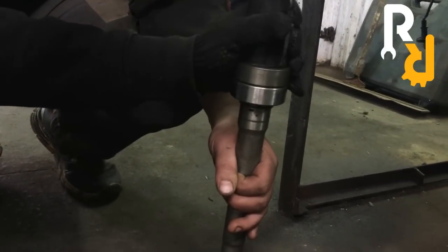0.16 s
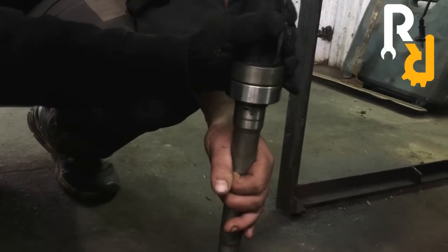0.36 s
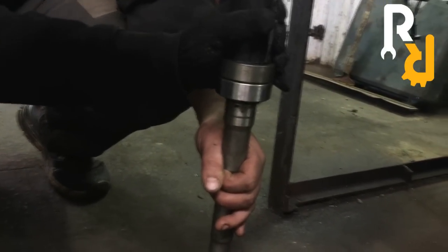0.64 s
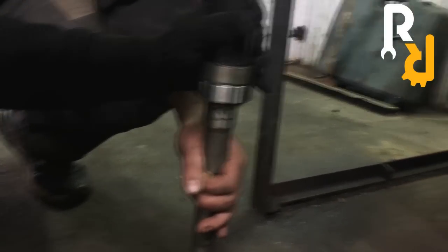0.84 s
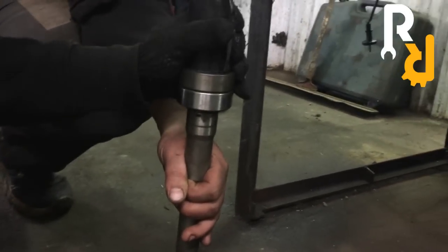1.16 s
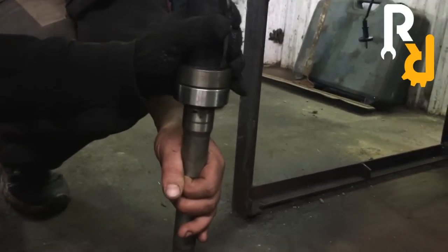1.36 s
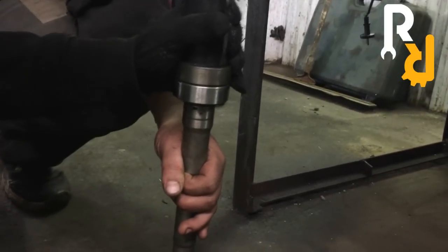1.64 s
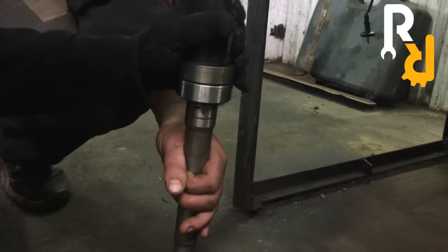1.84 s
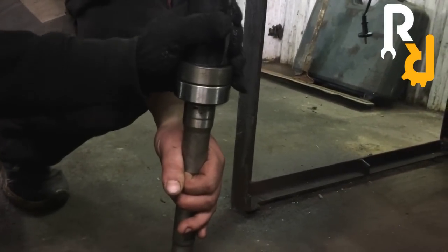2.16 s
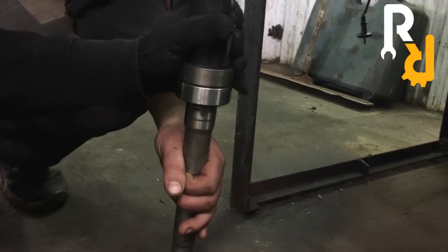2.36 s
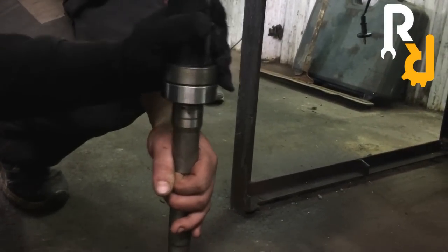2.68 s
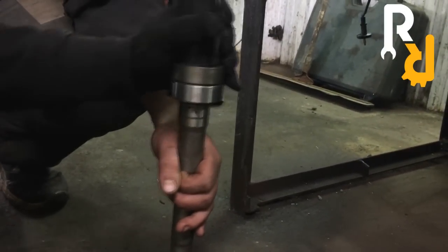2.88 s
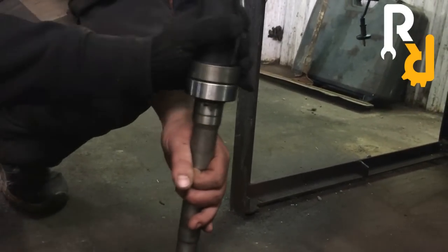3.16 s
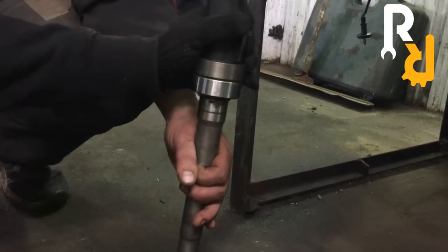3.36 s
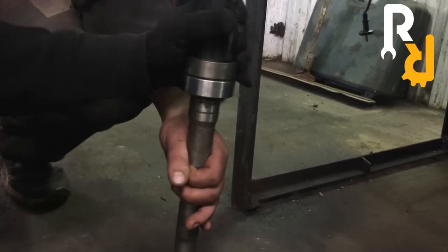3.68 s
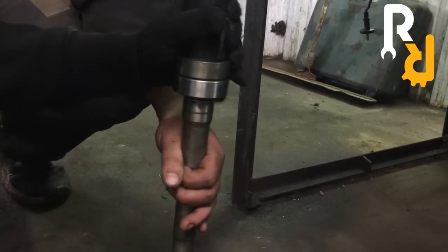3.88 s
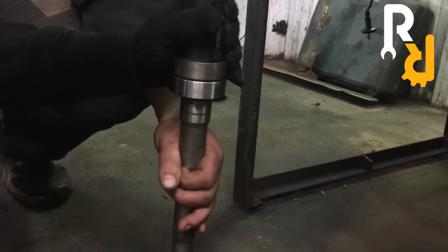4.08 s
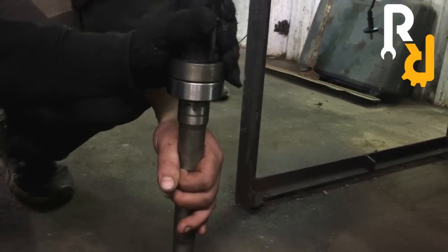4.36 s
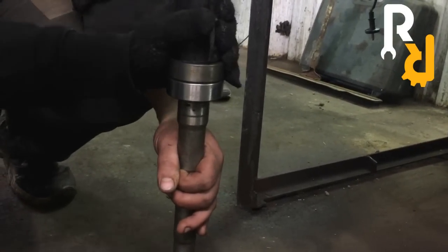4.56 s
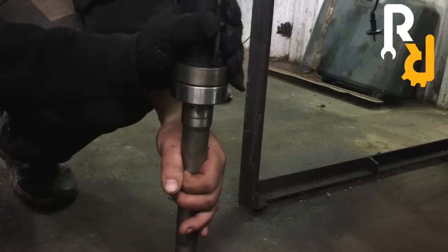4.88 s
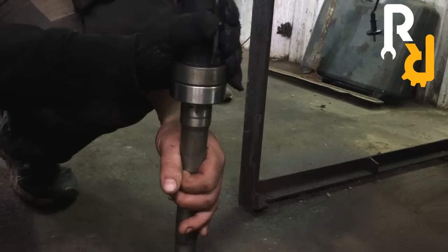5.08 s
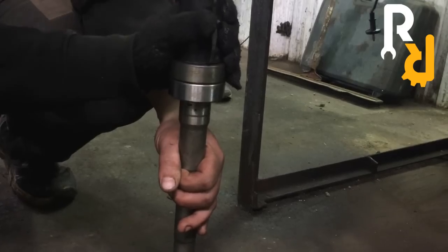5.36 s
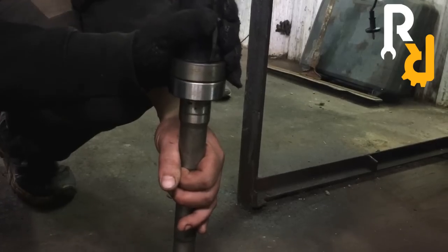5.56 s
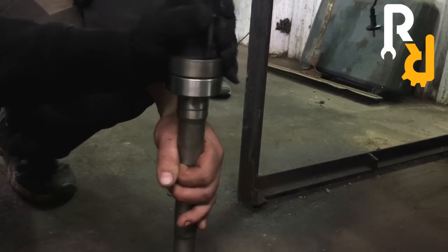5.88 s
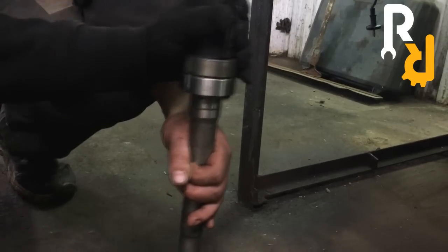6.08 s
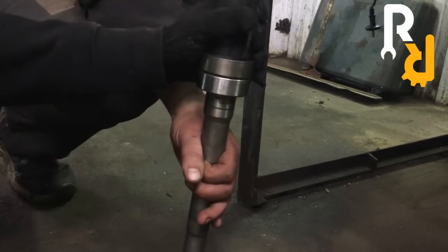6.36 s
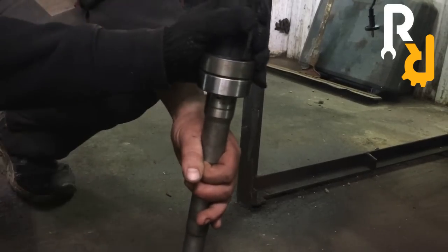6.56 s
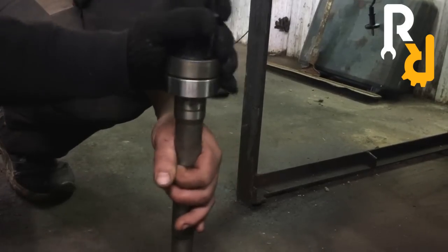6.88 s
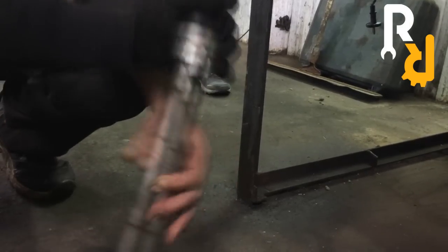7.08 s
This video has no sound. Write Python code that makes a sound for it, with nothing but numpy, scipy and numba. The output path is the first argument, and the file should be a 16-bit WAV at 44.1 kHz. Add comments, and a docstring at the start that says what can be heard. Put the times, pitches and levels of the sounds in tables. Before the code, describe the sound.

Close to the microphone, a hammer strikes a steel bearing on a hand-held shaft standing on concrete. Light setting taps alternate with heavy, bright cracks that thud deep into the floor, roughly one blow every half second with a pause midway. The hall rings after each hit. Finally the hammer drops and clatters, and the grip rustles faintly.

```python
"""A hammer drives a bearing onto a hand-held steel shaft that stands on a concrete floor, in a reverberant workshop.
Light setting taps alternate with heavy blows that thud into the floor; then the hammer is dropped and clatters.
Blows are chattering clicks, ringing steel modes and a sagging floor tone; knocks are shaped clicks with a thin ping.
Grip rustles and low rumble are shaped noise, and decaying noise makes the hall's echo.
The close microphone overloads on loud peaks; its gain control ducks them and lets the echo swell back."""
import sys
import numpy as np
from scipy import signal
from scipy.fft import rfft, irfft, next_fast_len
from scipy.io import wavfile
from scipy.ndimage import uniform_filter1d, minimum_filter1d, map_coordinates
from numba import njit

SR = 44100
rng = np.random.default_rng(int(sys.argv[2]) if len(sys.argv) > 2 else 0)


def to_wav(s):
    """Save 16-bit WAV."""
    ch = np.atleast_2d(s).T  # columns
    pcm = np.round(np.clip(ch, -1, 1) * 32767)  # PCM
    wavfile.write(sys.argv[1], SR, pcm.astype(np.int16))


N = 318666


def amp(db):
    """Decibels to gain."""
    return 10 ** (np.asarray(db) / 20)


def unit(x):
    """Scale to rms 1."""
    return x / np.sqrt(np.mean(x ** 2) + 1e-20)


def along(points, hz):
    """Read (f/Hz, value) points on a log frequency axis."""
    f, value = np.transpose(points)
    return np.interp(np.log(hz + 1), np.log(f + 1), value)


def fade(t, t60):
    """Exponential decay, 60 dB down at t60 seconds."""
    return np.exp(-np.log(1000) * t / np.maximum(t60, 1e-4))


def filtered(x, response):
    """Multiply the spectrum of x by a response, given as a function of frequency."""
    size = next_fast_len(len(x) + SR // 4)
    spectrum = rfft(x, size) * response(np.fft.rfftfreq(size, 1 / SR))
    return irfft(spectrum, size)[:len(x)]


def noise(size, shape_db):
    """Noise of rms 1 whose spectrum in dB is a function of frequency."""
    return unit(filtered(rng.standard_normal(size), lambda hz: amp(shape_db(hz))))


def add(track, s, sound):
    """Mix a sound into the track at time s, in seconds."""
    start = max(round(s * SR), 0)
    track[start:start + len(sound)] += sound[:N - start]


def click(shape_db, size=4096):
    """One sharp impulse of energy 1 whose spectrum in dB is a function of frequency."""
    cepstrum = irfft(np.log(amp(shape_db(np.fft.rfftfreq(size, 1 / SR)))))
    cepstrum[1:size // 2] *= 2  # folding makes it causal: all the energy comes right at the start
    cepstrum[size // 2 + 1:] = 0
    pulse = irfft(np.exp(rfft(cepstrum)))
    return pulse / np.linalg.norm(pulse)


def chattering(pulse, t, t60):
    """The pulse repeated densely at random, dying away."""
    bounces = rng.standard_normal(len(t)) * fade(t, t60)
    return signal.fftconvolve(bounces, pulse)[:len(t)]


def ring(modes, t):
    """Damped sine modes, each with a fresh level and phase at every strike."""
    total = np.zeros(len(t))
    for hz, db, t60 in modes:
        strike = amp(db + rng.standard_normal())
        total += strike * fade(t, t60) * np.sin(2 * np.pi * (hz * t + rng.random()))
    return total


# the workshop's low rumble: (f/Hz, relative level/dB)
RUMBLE_SPECTRUM = [(15, -33.5), (30, -19.5), (55, 0), (110, -4), (200, -10.5), (330, -13.5), (600, -15),
                   (900, -12), (1500, -19), (2100, -23.5), (3200, -43), (5000, -49), (8000, -51),
                   (15000, -55.5)]
RUMBLE_START_DB, RUMBLE_FALL_DB_PER_S = -41, 1


def ambience():
    """The workshop's low rumble: shaped noise that slowly gets quieter."""
    level_db = RUMBLE_START_DB - RUMBLE_FALL_DB_PER_S * np.arange(N) / SR
    return amp(level_db) * noise(N, lambda hz: along(RUMBLE_SPECTRUM, hz))


# how long the hall rings: (f/Hz, t60/s)
HALL_T60 = [(100, .7), (300, 0.87), (1000, 1.45), (2000, 1.428), (4000, 1.177), (6000, 0.9), (8500, 0.61),
            (12000, .48), (16000, .38)]
# tone of the hall's echo: (f/Hz, level/dB)
HALL_COLOUR = [(60, -34.5), (170, -6.5), (300, 8.5), (500, 4), (1200, 2.5), (3500, -.5), (6000, -6),
               (10000, -3.5), (16000, -8.5)]


def hall(sound, near_db, hall_db, near_t60, build_s=0.0009):
    """Quick scatter off nearby things and the hall's long tail, as noise decaying at its own rate in each band."""
    hz, s, bands = signal.stft(rng.standard_normal(2 * SR), SR, nperseg=256)
    near = amp(near_db) * fade(s, near_t60)
    far = amp(hall_db) * fade(s, along(HALL_T60, hz)[:, None])
    colour = amp(along(HALL_COLOUR, hz))[:, None]
    tail = signal.istft(bands * (near + far) * colour, SR, nperseg=256)[1]
    tail *= 1 - np.exp(-np.arange(len(tail)) / SR / build_s)  # echoes take a moment to arrive
    return signal.fftconvolve(sound, tail)


# spectrum of steel on steel: (f/Hz, level/dB)
CRACK_SPECTRUM = [(30, -37), (150, -12), (400, -0.5), (650, 1), (850, -3), (2000, 1), (2600, -1.5),
                  (3800, 1.5), (5300, -1), (6700, -5.5), (7600, -11), (8700, -10), (10200, -18.5),
                  (11500, -16), (15500, -20.5)]
LINGER_DB, LINGER_AGE_S = 8, 0.5


def lingering_echo():
    """The hall's dying answer to an earlier blow: an echo joined half a second into its decay."""
    crack = click(lambda hz: along(CRACK_SPECTRUM, hz))
    echo = hall(crack, near_db=-46, hall_db=-50, near_t60=0.16)
    track = np.zeros(N)
    add(track, 0, amp(LINGER_DB) * echo[round(LINGER_AGE_S * SR):])
    return track


# the grip shifts on the steel: (t/s, level/dB, length/s either side of the peak)
RUSTLES = [(3.685, -71.5, 0.021), (4.475, -63.5, 0.041), (7.05, -54.5, .022), (7.105, -60.5, 0.021),
           (7.166, -59, .017)]


def grip():
    """Faint gritty rustles of glove and hand: uneven grains of noise under short swells."""
    t = np.arange(N) / SR
    strokes = sum(amp(db) * np.exp(-((t - s) / length) ** 2) for s, db, length in RUSTLES)
    grains = unit(uniform_filter1d(rng.exponential(size=N) ** 3, 40))
    spectrum = [(500, -5), (4200, 3.5), (8000, -4.5), (15000, -11)]  # (f/Hz, level/dB)
    return strokes * grains * noise(N, lambda hz: along(spectrum, hz))


# loose knocks, rebounds and the hammer falling on the floor: (t/s, level/dB, centre f/Hz)
KNOCKS = [ (1.6940, 19, 3780), (4.8568, 3, 3820), (6.6900, 9.5, 1610), (6.6939, 5.5, 380),
          (6.7160, -12, 1500), (6.7411, 14.5, 2330), (6.7440, 6.5, 920), (6.767, 1.5, 1730),
          (6.7881, 1.5, 1570), (6.8706, 5.5, 4300), (6.921, -8, 2600), ]
# spectrum shared by the knocks: (f/Hz, level/dB)
KNOCK_SPECTRUM = [(30, -11.5), (160, 8), (350, 11), (1000, 1.5), (2800, -3.5), (5000, -17.5), (8000, -27.5),
                  (15000, -36.5)]
# thin ping of hardened steel, heard in knocks and blows: (f/Hz, level/dB, t60/s)
PING = [(11200, -32, .15), (14580, -39, .12), (15020, -49.5, .15)]


def knocks():
    """Single contacts, each focused around its own pitch, with a little chatter, a thin ping and an echo."""
    track, t = np.zeros(N), np.arange(SR // 2) / SR
    for s, db, centre_hz in KNOCKS:
        focus_db = lambda hz: -7 * np.log1p(np.log2((hz + 1) / centre_hz) ** 2)
        contact = click(lambda hz: along(KNOCK_SPECTRUM, hz) + focus_db(hz))
        chatter = amp(-22) * chattering(contact, t, t60=0.025)
        ping = amp(-28.5) * ring(PING, t)
        echo = hall(contact, near_db=-46.5, hall_db=-47.0, near_t60=0.36)
        for part in contact, chatter + ping, echo:
            add(track, s, amp(db) * part)
    return track


# treble gained per octave above the corner, for each dB of force over a medium blow (lost below it)
BRIGHTER_DB, BRIGHT_ABOVE_HZ, MEDIUM_FORCE_DB = 0.2535, 3800, 4
CLANG_OCTAVES = 0.42  # from the clang's centre to half its boost in dB
RESONANCE_DB, RESONANCE_SPACING_HZ = 2.16, 130  # random ripple: a crowd of short resonances


def steel_contact(force_db, clang_hz, clang_db):
    """The crack of the hammer face: brighter the harder it lands, with a broad clang and many small resonances."""
    heights = rng.standard_normal(size=512)  # drawn anew for each blow

    def shape_db(hz):
        octaves_up = np.log2(np.maximum(hz / BRIGHT_ABOVE_HZ, 1))
        treble = BRIGHTER_DB * (force_db - MEDIUM_FORCE_DB) * octaves_up
        clang = clang_db / (1 + (np.log2((hz + 1) / clang_hz) / CLANG_OCTAVES) ** 2)
        ripple = map_coordinates(heights, [hz / RESONANCE_SPACING_HZ], mode="mirror")
        crowd = RESONANCE_DB * hz / (hz + 1500) * ripple  # little ripple in the bass
        return along(CRACK_SPECTRUM, hz) + treble + clang + crowd

    return click(shape_db)


# the floor's note: where it settles, how far above that it starts, and how fast it sags
THUD_HZ, THUD_SAG_HZ, THUD_SAG_S = 54.6, 210, 0.0049
THUD_ATTACK_S, THUD_LONGEST_T60_S = 0.0026, 0.095


def thud(t, weight_db):
    """The shaft punches the floor with a falling pitch; a harder push swings for longer, up to a limit."""
    cycles = THUD_HZ * t + THUD_SAG_HZ * THUD_SAG_S * (1 - np.exp(-t / THUD_SAG_S))
    t60 = THUD_LONGEST_T60_S * amp(min(weight_db, 0) / 2)
    attack = 1 - np.exp(-t / THUD_ATTACK_S)
    return np.sin(2 * np.pi * cycles) * fade(t, t60) * attack


# hammer blows, the heavy ones thudding harder as the bearing seats;
# where the face lands sets the pitch of the clang and how freely each part rings:
# (t/s, force level/dB, chatter t60/s, floor thud level/dB, clang centre f/Hz, clang level/dB,
#  shaft ring level/dB, race ring level/dB, ping level/dB)
BLOWS = [ (0.0005, -0.5, 0.0043, -60.5, 8700, 3, -1.5, -10, -13.5),
         (0.5632, 13, 0.022, -16, 2750, 3, -11, -5, -14), (1.092, 4.5, 0.025, -59, 990, 3.5, 1, 1.5, -9.5),
         (1.642, 16, 0.062, -0.5, 3780, 4.5, 2.5, -7.5, 2.5),
         (2.1780, 1.5, 0.045, -48, 3200, 6, -3.5, -14.5, -31),
         (2.7523, 15, 0.048, 1, 500, 1.5, -9.5, -15, -3.5), (4.1620, -2, 0.023, -41, 2120, 6.5, -8, 1.5, 2),
         (4.803, 17, .033, 5, 5240, 8, -14, -6.5, -5.5), (5.3630, 0, 0.04, -62, 3110, 3.5, -21, -11.5, 3),
         (5.9090, 14, 0.03, 6, 1300, 5, -14, -13.5, 0), ]
# steel modes of shaft, bearing race and hammer head: (f/Hz, level/dB, t60/s)
SHAFT = [(626, -23.5, .06), (2012, -12.5, .035), (3280, -19.5, .035), (3725, -12, .08), (6680, -26, 0.054)]
RACE = [(2060, -17, 0.0076), (2130, -15, 0.014), (5400, -10.5, 0.027), (5330, -12, 0.089), (5340, -39, .31),
        (13700, -25, .055)]
HEAD = [(4670, -14, 0.041), (8530, -20, 0.043), (8480, -18.5, .06), (12130, -26.5, .049)]
# spectrum of the floor's shudder: (f/Hz, level/dB)
SHUDDER_SPECTRUM = [(20, 3.5), (45, -1), (100, -4), (170, -1), (330, -14), (1500, -49)]
RING_LOSS = 0.13  # dB of race and head ring lost per dB of force: a hard blow presses the parts together
HALL_GROWS, SCATTER_GROWS = 0.22, 0.84  # extra dB of echo per dB of force: hard blows shake things nearby


def hammer():
    """Each blow makes the parts chatter, rings shaft, bearing and hammer head, and pushes on the floor."""
    track, t = np.zeros(N), np.arange(SR * 3 // 4) / SR
    for s, force_db, chatter_t60, thud_db, clang_hz, clang_db, shaft_db, race_db, ping_db in BLOWS:
        crack = steel_contact(force_db, clang_hz, clang_db)
        chatter = chattering(crack, t, chatter_t60)

        pressed = amp(-RING_LOSS * force_db) * (amp(race_db) * ring(RACE, t) + ring(HEAD, t))
        steel = amp(shaft_db) * ring(SHAFT, t) + pressed + amp(ping_db) * ring(PING, t)

        shudder = noise(len(t), lambda hz: along(SHUDDER_SPECTRUM, hz)) * fade(t, t60=0.08)
        shudder_db = thud_db / 2 - 11  # grows more slowly than the thud
        floor = amp(thud_db) * thud(t, thud_db) + amp(shudder_db) * shudder

        # one strong pulse stands for the chatter in the echo
        radiated = steel + amp(22.0) * np.pad(crack, (0, len(t) - len(crack)))
        near_db = -45.0 + SCATTER_GROWS * force_db
        echo = hall(radiated, near_db, hall_db=-50.0, near_t60=0.16)
        add(track, s, amp(force_db) * (chatter + steel + floor))
        add(track, s, amp(force_db + HALL_GROWS * force_db) * echo)
    return track


def scene():
    """Everything that reaches the microphone."""
    return (hammer() + knocks() + grip() + ambience() + lingering_echo())[None]


@njit
def follow(wanted, attack, release):
    """A gain that drops quickly to the wanted value and creeps back; times in samples."""
    out, gain = np.empty_like(wanted), 1.0
    for i in range(len(wanted)):
        gain += (wanted[i] - gain) / (attack if wanted[i] < gain else release)
        out[i] = gain
    return out


def gain_control(x, threshold_db, depth_db, hold, attack, release):
    """Loud sound pulls the gain down, by depth_db at most, where it stays for a moment; times in seconds."""
    level = np.sqrt(np.abs(uniform_filter1d(x ** 2, size=128)))
    wanted = np.maximum(1 / np.maximum(level / amp(threshold_db), 1), amp(depth_db))
    half = int(hold * SR / 2)
    held = minimum_filter1d(wanted, 2 * half + 1, origin=half, mode="nearest")  # looks back only
    return x * follow(held, attack * SR, release * SR)


CEILING, TOP_HZ = 0.73, 15900  # overload level in full scale, band limit


def record(dry):
    """A slow gain control, a limiter that lets go abruptly, overload on what both miss, and the band limit."""
    x = gain_control(dry[0], threshold_db=1.5, depth_db=-11.5, hold=0.4, attack=0.002, release=0.62)
    x = gain_control(x, threshold_db=-11, depth_db=-6.5, hold=0.188, attack=0.008, release=0.014)
    x = x / (1 + (x / CEILING) ** 6) ** (1 / 6)
    return filtered(x, lambda hz: 1 / (1 + (hz / TOP_HZ) ** 160))[None]


dry = scene()
out = record(dry)
to_wav(out)
```